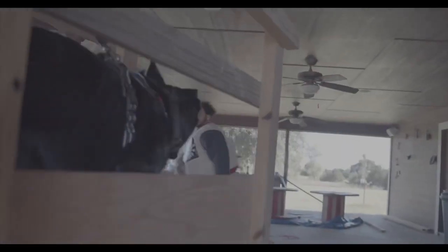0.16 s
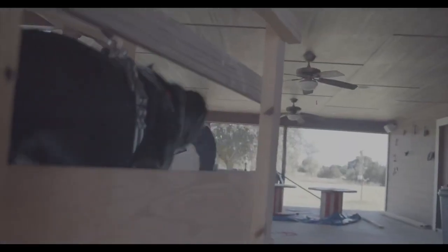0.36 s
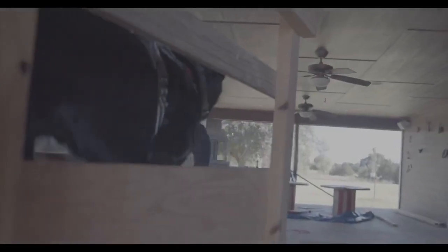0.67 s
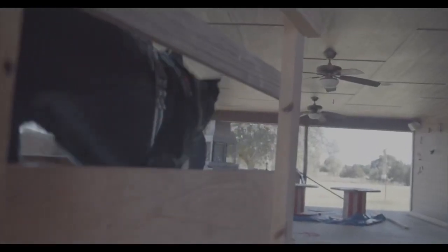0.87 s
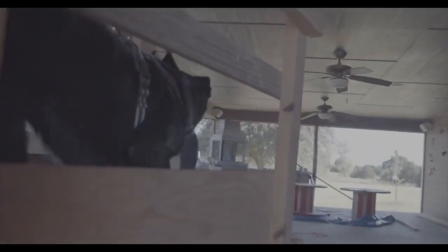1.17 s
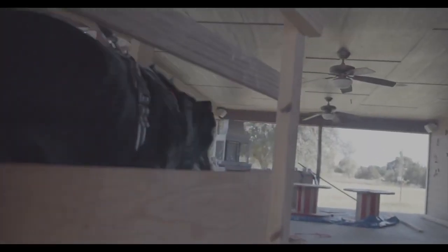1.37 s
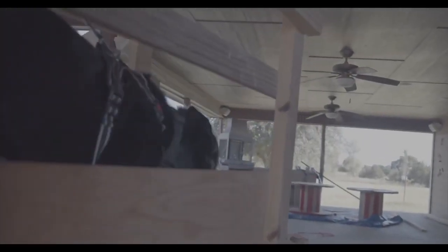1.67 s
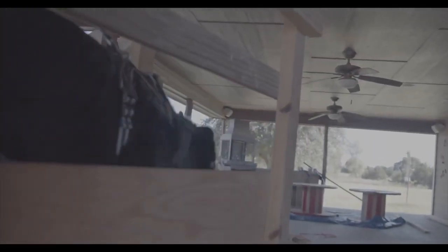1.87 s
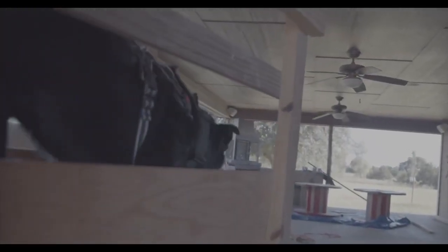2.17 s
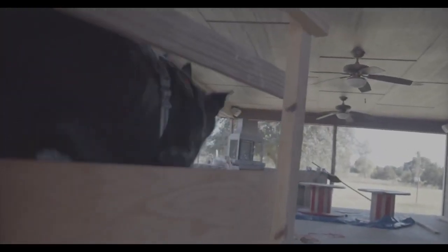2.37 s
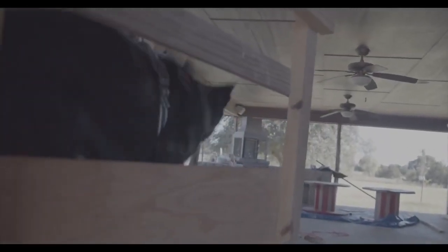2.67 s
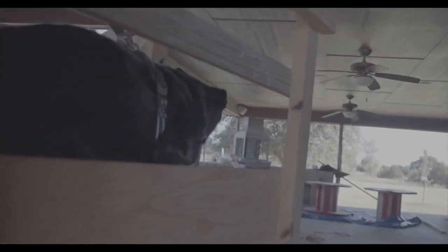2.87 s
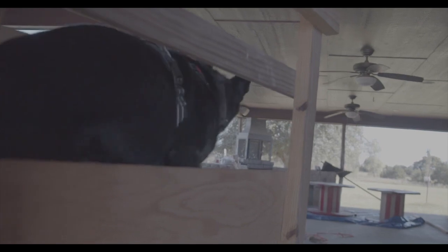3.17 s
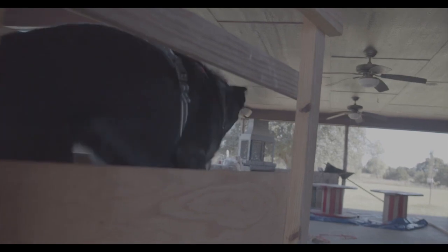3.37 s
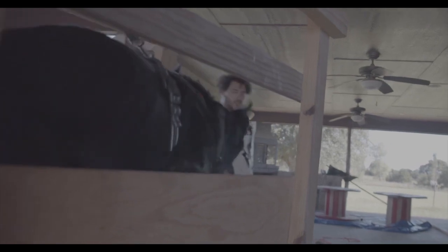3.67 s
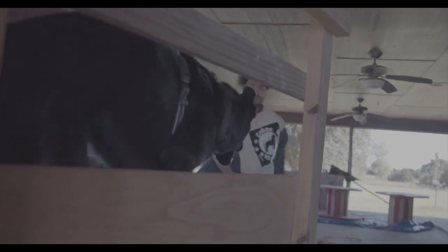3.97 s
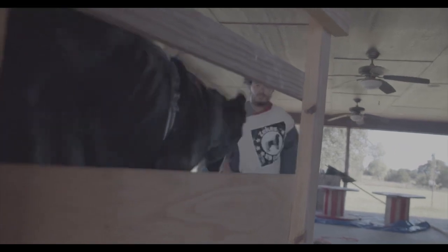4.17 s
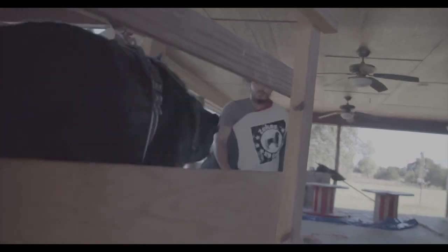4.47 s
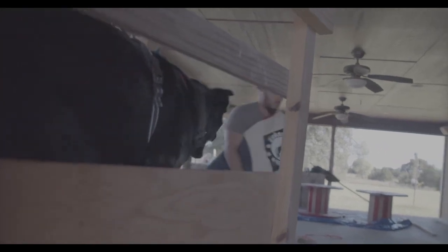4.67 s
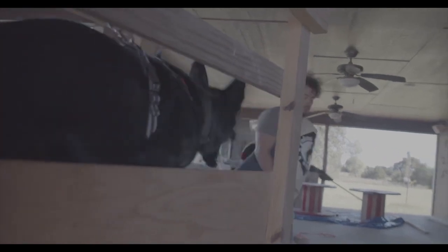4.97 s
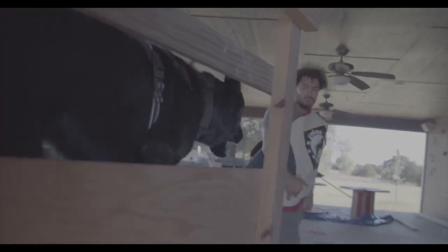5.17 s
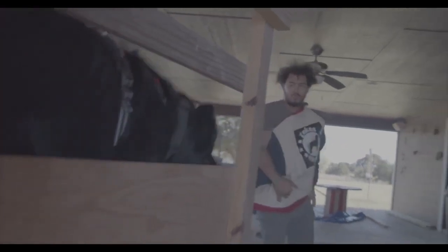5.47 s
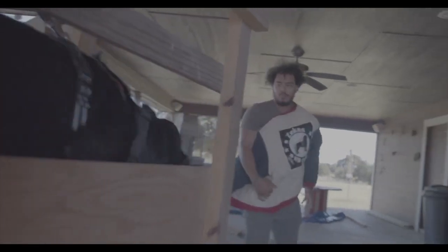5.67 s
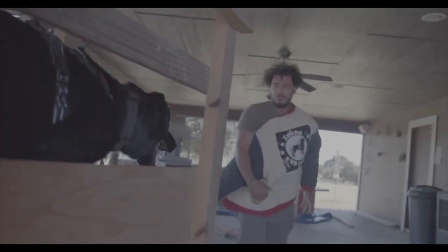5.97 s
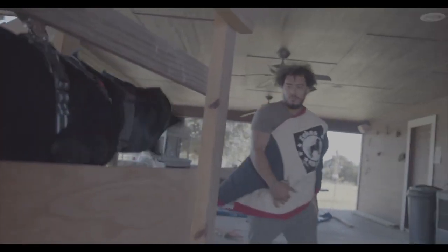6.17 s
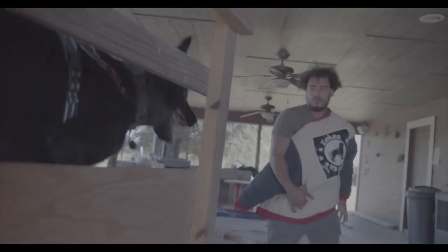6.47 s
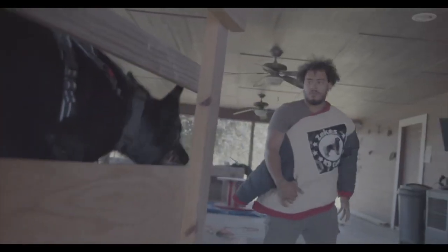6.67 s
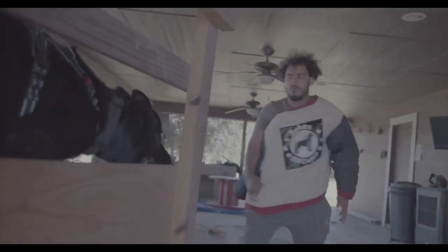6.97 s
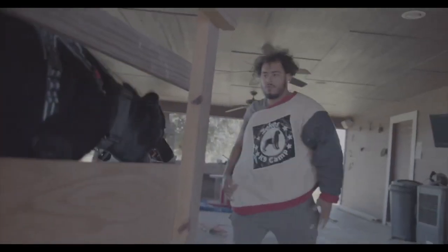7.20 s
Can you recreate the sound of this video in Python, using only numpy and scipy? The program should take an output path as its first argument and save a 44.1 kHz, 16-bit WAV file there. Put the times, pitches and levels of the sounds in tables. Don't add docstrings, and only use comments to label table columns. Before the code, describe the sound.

A big dog close to the microphone gives eleven short, rough, distorted barks, roughly every 0.6 seconds with one longer gap early on. Before each bark it sucks in a quiet throaty breath. Between barks its chain clinks, paws scrape and softly thump on boards. Other dogs yap faintly far off, mostly in the first part. A hard patio roof adds a short, bright slap of reverb over a dull, low outdoor wash.

```python
import sys
import numpy as np
from scipy import signal
from scipy.io import wavfile
from scipy.ndimage import uniform_filter1d

SR = 44100
rng = np.random.default_rng(int(sys.argv[2]) if len(sys.argv) > 2 else 0)


def pcm_store(signal):
    levels = np.round(np.clip(np.atleast_2d(signal), -1, 1) * 32767)
    wavfile.write(sys.argv[1], SR, levels.astype(np.int16).T)


def gain_from_db(level_db):
    decades = np.asarray(level_db, float) / 20
    return 10 ** decades


N = 323694


def band(x, lo_hz, hi_hz, order=2):
    return signal.sosfilt(signal.butter(order, [lo_hz, min(hi_hz, .45 * SR)], "band", fs=SR, output="sos"), x)


def unit(x):
    return x / np.sqrt(np.mean(x ** 2))


def pair(size, likeness):
    mid, side = rng.standard_normal((2, size))
    likeness = np.clip(likeness, 0, 1)
    sides = side * np.array([[1], [-1]])
    return (np.sqrt(1 + likeness) * mid + np.sqrt(1 - likeness) * sides) / np.sqrt(2)


def add(out, x, start_s):
    i = max(int(start_s * SR), 0)
    out[i:i + len(x)] += x[:N - i]


# frequency in Hz, level in dB per Hz.
WASH_SPECTRUM = [(30, -21), (480, -18.5), (680, 0), (960, -9.5), (1360, -6.5), (1920, -13.5), (4250, -25.5),
                 (16000, -53.5)]


def wash():
    out = 0
    table_hz, table_db = np.transpose(WASH_SPECTRUM)
    for hz in 30 * 2 ** np.arange(0, 9.1, .5):
        steps = np.repeat(rng.standard_normal(N // 3000 + 1), 3000)
        flicker = unit(uniform_filter1d(steps, size=3000)[:N])
        noise = unit(band(pair(N, .9 - hz / 2500), hz / 2 ** 0.25, hz * 2 ** 0.17))
        level_db = np.interp(np.log(hz), np.log(table_hz), table_db) + 2.0 * flicker
        out = out + gain_from_db(level_db) * np.sqrt(hz) * noise
    level_db, swell_db, swell_s = -43, 1, .3
    swell = unit(uniform_filter1d(rng.standard_normal(N), size=int(swell_s * SR)))
    return unit(out) * gain_from_db(level_db + swell_db * uniform_filter1d(swell, size=3000))


# centre in Hz, decay t60 in seconds, level in dB, left-right likeness 0-1.
PATIO_BANDS = [(250, .3, -4, .8), (600, .5, 0, .7), (1200, .48, -1, .2), (2400, .4, -3, .1),
               (5000, .24, -5, 0), (10000, .1, -9, 0)]


def patio():
    yard_db, yard_t60_s = -40, 1.3
    t = np.arange(SR) / SR
    build = np.clip((t - .003) / 0.0024, 0, 1)
    tail = 0
    for hz, t60, db, likeness in PATIO_BANDS:
        decay = gain_from_db(-60 * t / t60) + gain_from_db(yard_db - 60 * t / yard_t60_s)
        echoes = unit(band(pair(SR, likeness), hz / 1.586, hz * 2.835)) * decay * build
        tail = tail + gain_from_db(db) * echoes * np.sqrt(hz / t60)
    return tail / np.sqrt(60 * SR)


UPPER_PARTIALS_DB = [-11, -28, -42]


def voice(hz, second_db, rough, alternate):
    shake = unit(band(rng.standard_normal((2, SR // 4)), 40, 400))[:, :len(hz)]
    pitch_shake, level_shake = rough * shake
    phase = 2 * np.pi * np.cumsum(hz) / SR + .75 * pitch_shake
    first = np.sin(phase - 1.11 * pitch_shake)
    second = gain_from_db(second_db) * np.sin(2 * phase - .5 * pitch_shake + 1.71)
    strength = np.sqrt(1 + gain_from_db(second_db) ** 2) * gain_from_db(-36 * rough)
    high = sum(gain_from_db(db) * np.sin((k + 3) * phase) for k, db in enumerate(UPPER_PARTIALS_DB))
    strong_weak = 1 + 2 * alternate * np.cos(phase / 2)
    return np.sqrt(2) * (first + second + strength * high) * (1 + 1.11 * level_shake) * strong_weak


# start in seconds, length
# in seconds, pitch in Hz, level in dB, second partial in dB.
ROOM_VOICES = [
    (0, 0.012, 597, -31.5, -1.5),
    (0.099, 0.1, 734, -44, -11),
    (0.806, 0.095, 618, -40, 9.5),
    (1.365, 0.058, 635, -34.5, -1.5),
    (1.858, 0.021, 760, -55, -7),
    (2.179, 0.144, 609.7, -39, -4),
    (4.149, 0.25, 262.7, -47.5, 0),
]


def room_voices():
    out = np.zeros(N)
    for s, length, pitch_hz, db, second_db in ROOM_VOICES:
        arch = np.sin(np.pi * np.linspace(0, 1, int(length * SR)))
        hz = pitch_hz * (.95 + .06 * arch)
        third = gain_from_db(-6) * np.sin(2 * np.pi * 3 * np.cumsum(hz) / SR)
        third = third * (abs(hz - 620) < 60)
        yap = band(voice(hz, second_db, .4, 0) + third, hz[0] / 1.4, 4000)
        add(out, gain_from_db(db) * arch * yap, s)
    return out


# start in seconds, peak level in dB.
PAW_LANDINGS = [
    (2.861, -42),
    (3.538, -38),
    (4.141, -40),
    (5.41, -35),
    (6.043, -43),
    (7.051, -40),
]


def thumps():
    board_hz, board_t60_s = 213, 0.29
    out, t = np.zeros(N), np.arange(SR // 4) / SR
    for s, db in PAW_LANDINGS:
        ring = unit(band(rng.standard_normal(len(t)), board_hz / 1.9, board_hz * 1.86))
        add(out, gain_from_db(db - 6.5 - 60 * t / board_t60_s) * np.clip(t / 0.005, 0, 1) * ring, s)
    return out


# start in seconds, length in seconds, level in dB, centre in Hz.
PAW_SCUFFS = [
    (1.196, 0.069, -45.5, 2500),
    (1.618, 0.09, -36.5, 2990),
    (2.774, 0.057, -30.5, 2960),
    (3.401, 0.041, -44.5, 3400),
    (3.675, 0.039, -26.5, 1370),
    (4.277, 0.057, -31, 2390),
]


def paws():
    jingle_db = -7
    out, t = np.zeros(N), np.arange(SR // 4) / SR
    for s, length, db, hz in PAW_SCUFFS:
        noise, grain = rng.standard_normal((2, SR // 4))
        shape = np.clip(t / .008, 0, 1) * np.clip((length - t) / .025 + 1, 0, 1)
        rub = unit(band(noise, hz / 3, hz * 1.59)) + gain_from_db(-21.5) * unit(band(noise, 7000, 16000, order=1))
        link_hz, phase = rng.uniform((2000, 0), (15800, 2 * np.pi), (60, 2)).T[:, :, None]
        jingle = np.sum(np.sin(2 * np.pi * link_hz * t + phase) * (2000 / link_hz) ** 1.3, axis=0)
        ragged_db = db + 1.87 * unit(uniform_filter1d(grain, size=150))
        add(out, gain_from_db(ragged_db) * shape * (rub + gain_from_db(jingle_db) * unit(jingle)), s)
    return out


# start in seconds, peak level in dB, brightness as treble over middle in dB.
LINK_KNOCKS = [(1.2012, -22, -21), (1.2214, -28, -19), (1.2994, -38, -12), (1.3274, -37, -13),
               (2.0667, -32, -16), (2.575, -26, -23), (3.057, -38, -17), (3.0804, -41, 2),
               (3.1173, -37, -2), (3.5823, -45, -5), (4.1175, -28, -22), (4.1619, -31, -18),
               (4.1994, -42, -14), (4.8633, -40, -12), (5.468, -39, -17), (6.0057, -34, -23),
               (6.124, -34, -18), (6.5301, -44, -10), (6.5595, -41, -15), (6.6333, -36, -26),
               (7.0494, -39, -13)]
# frequency in Hz, level in dB, decay t60 in seconds.
LINK_MODES = [(1770, -4, .03), (2300, 0, .03), (2940, -2, .03), (3300, -6, .025), (3810, -6, .025),
              (4500, -4, .025), (5150, -6, .02), (7600, -6, .02)]
# start in seconds, frequency in Hz, level in dB, decay t60 in seconds.
THIN_RINGS = [
    (.5, 6800, -61, .4),
    (.5, 11400, -63, 0.51),
    (3.393, 12170, -43, 0.23),
    (5.118, 6837, -60, 0.58),
]


def chain():
    out, t = np.zeros(N), np.arange(SR // 2) / SR
    hz, mode_db, t60 = np.array(LINK_MODES).T[:, :, None]
    scatter_db = 3
    for s, db, bright_db in LINK_KNOCKS:
        chance, noise = rng.standard_normal((2, len(LINK_MODES), 1)), rng.standard_normal(len(t))
        bright_db = min(bright_db, -3)
        gain = gain_from_db(db - 6 + mode_db + scatter_db * chance[0] + bright_db * (hz > 4000))
        modes = np.sin(2 * np.pi * hz * (1 + 0.0087 * chance[1]) * t)
        rings = np.sum(gain * modes * gain_from_db(-60 * t / t60), axis=0)
        tick = band(noise, 1000, 4000) + gain_from_db(bright_db) * band(noise, 4000, 8500)
        tick = gain_from_db(db + 4 - 60 * t / .04) * tick
        add(out, (rings + tick) * np.clip(t / .002, 0, 1), s)
    for s, ring_hz, db, ring_t60 in THIN_RINGS:
        add(out, gain_from_db(db - 60 * t / ring_t60) * np.sin(2 * np.pi * ring_hz * t), s)
    return out


# centre in Hz, width in Hz, level in dB.
THROAT = [(356, 110, -21.5), (710, 130, -10.5), (994, 175, -3.5), (1730, 130, -14.5), (2600, 320, -12.5)]


def gasps():
    before_s, gasp_s, gasp_db = .215, .175, -44
    next_bark_s = 7.36
    out, u = np.zeros(N), np.linspace(0, 1, int(gasp_s * SR))
    for s in [bark[0] for bark in BARKS_HEARD] + [next_bark_s]:
        noise, flutter = rng.standard_normal((2, SR // 3))
        air = unit(sum(gain_from_db(db) * unit(band(noise, hz - width / 2, hz + width / 2)) for hz, width, db in THROAT))
        level_db = gasp_db + 2 * unit(uniform_filter1d(flutter, size=500)) + rng.standard_normal()
        add(out, (air * gain_from_db(level_db))[:len(u)] * np.sin(np.pi * u) ** 0.97, s - before_s)
    return out


# start in seconds, length in seconds, top pitch in Hz, level in dB.
BARKS_HEARD = [(0.269, .108, 664, -9.5), (0.871, 0.13, 664, -8), (1.464, 0.14, 690.4, -14),
               (2.616, 0.1, 642, -8), (3.204, .11, 636.7, -8.5), (3.76, .084, 635.4, -5),
               (4.339, 0.11, 634.5, -9), (4.963, .098, 635.9, -9), (5.579, 0.091, 635.6, -5.5),
               (6.148, .1, 643.6, -8), (6.738, 0.1, 645.2, -7)]
BARK_ROUGHNESS = [.25, .27, .4, .22, .14, .19, .33, .34, .22, .28, .38]


def dog():
    open_hz, close_hz = 550.9, 566
    clean_share, top_share, loud_share = .28, .37, .76
    opening_db, end_db = -13, -7.5
    second_early_db, second_late_db = 2, -6
    doubling, slip_hz = .4, 800
    rasp_db, rasp_top_hz, ring_hz, ring_db = -21.5, 3400, 1620, 4
    out = np.zeros(N)
    for (s, length, top_hz, db), rough in zip(BARKS_HEARD, BARK_ROUGHNESS):
        t = np.arange(0, min(length, .24), 1 / SR)
        left_s = length - t
        top_s = top_share * length
        rise, sag = np.clip(t / top_s, 0, 1), np.clip((t - top_s) / (length - top_s), 0, 1)
        hz = open_hz + (top_hz - open_hz) * np.sin(np.pi / 2 * rise)
        hz = hz - (top_hz - close_hz) * np.sin(np.pi / 2 * sag) ** 2
        hz = hz * (1 - .13 * np.clip(1 - left_s / .04, 0, 1))
        swell_db = np.interp(t, [top_s, loud_share * length, length], [opening_db - db, 0, end_db])
        effort = rise ** 0.72 * gain_from_db(swell_db)
        shut = np.clip(left_s / .03, 0, 1)
        broken = np.clip((t - clean_share * length) / .02, .2, 1)
        second_db = second_early_db + (second_late_db - second_early_db) * sag
        slipped_hz = hz - slip_hz * rough ** 3 * broken * (1 - sag)
        folds = voice(slipped_hz, second_db, rough * broken, doubling * rough * broken)
        air = rng.standard_normal(SR // 4)
        throat_ring = unit(band(air, ring_hz / 1.01, ring_hz * 1.15))
        air = unit(band(air, 930, rasp_top_hz, order=1)) + gain_from_db(ring_db) * throat_ring
        rasp = gain_from_db(rasp_db) * broken * air[:len(t)]
        add(out, (folds + rasp) * gain_from_db(db) * effort * shut, s)
    return band(out, 370, 12000)


def scene():
    room_lean_db, lean_db = -1.5, -1.5
    lead_s = -4.5e-5
    small_send_db, patio_db = -10, -6
    room = patio() * gain_from_db(room_lean_db / 2 * np.array([[1], [-1]]))
    barks, small = dog(), chain() + paws() + gasps() + thumps()
    near = barks + small
    left = np.interp(np.arange(N) - lead_s * SR, np.arange(N), near)
    direct = np.array([gain_from_db(lean_db / 2) * left, gain_from_db(-lean_db / 2) * near])
    send = barks + gain_from_db(small_send_db) * small + room_voices()
    wet = signal.fftconvolve(send[None], room, axes=1)[:, :N]
    return direct + gain_from_db(patio_db) * wet + wash()


def top_cut(x):
    return signal.sosfilt(signal.butter(12, 16750, fs=SR, output="sos"), x)


def record(dry):
    ceiling, skew = 1, 0.018
    mix = np.clip(dry, -ceiling, ceiling - skew)
    return top_cut(mix)


dry = scene()
out = record(dry)
pcm_store(out)
```